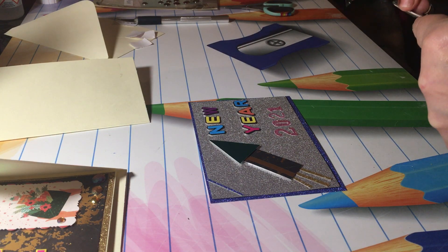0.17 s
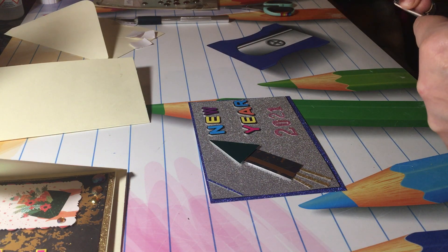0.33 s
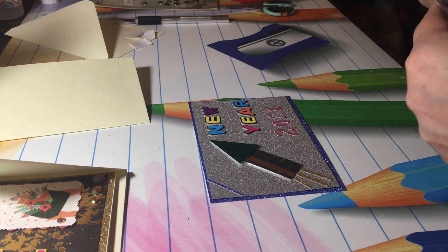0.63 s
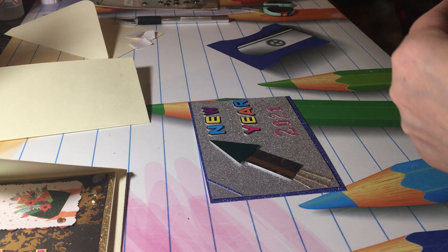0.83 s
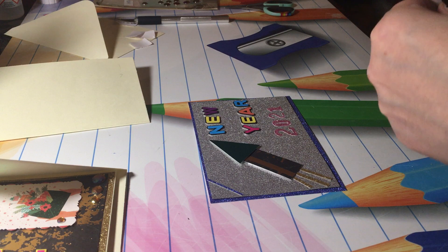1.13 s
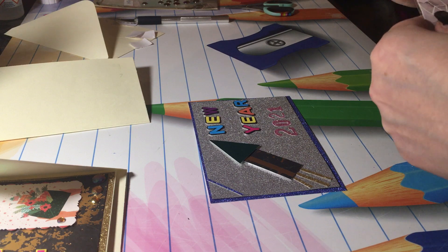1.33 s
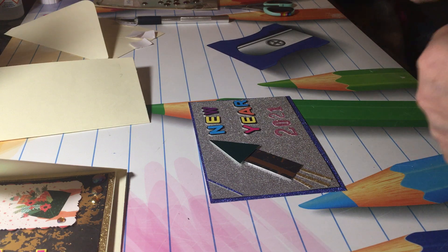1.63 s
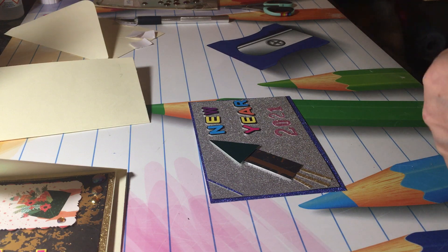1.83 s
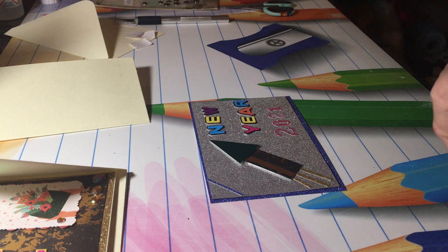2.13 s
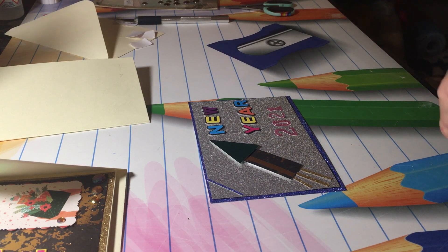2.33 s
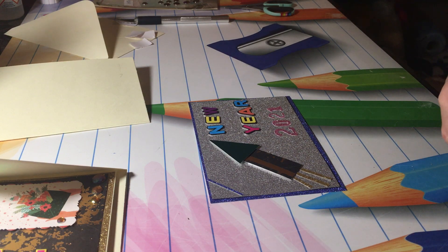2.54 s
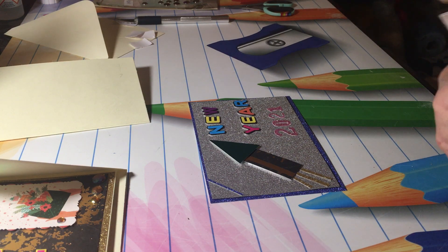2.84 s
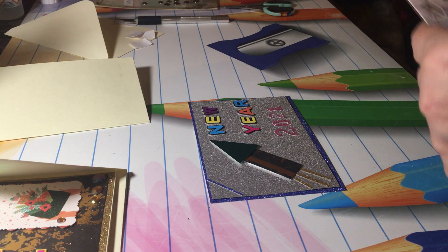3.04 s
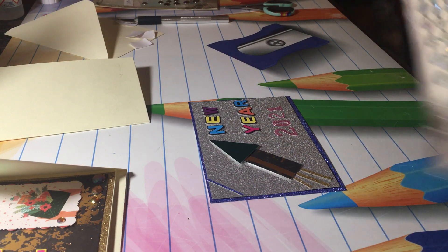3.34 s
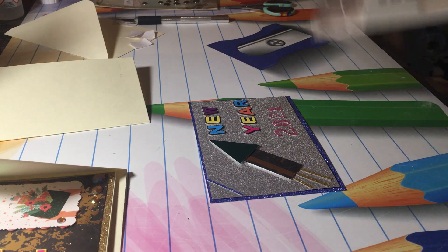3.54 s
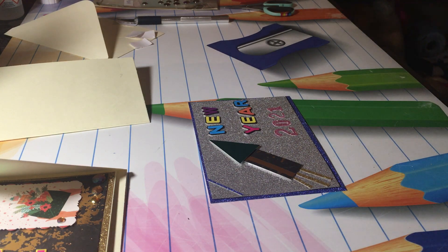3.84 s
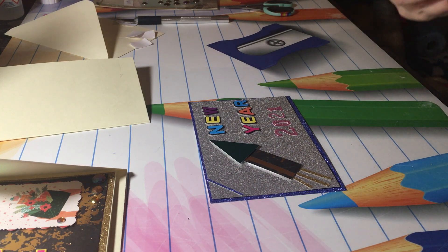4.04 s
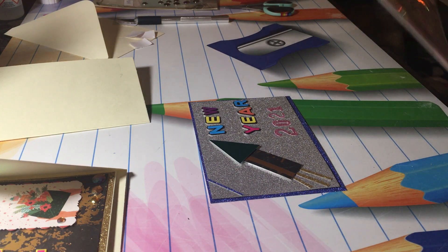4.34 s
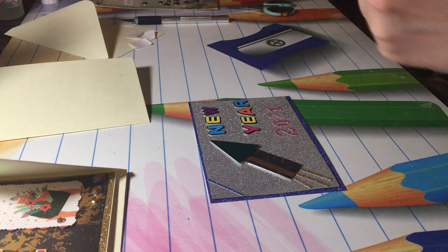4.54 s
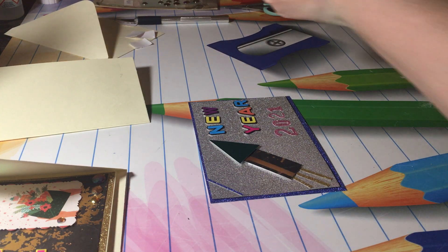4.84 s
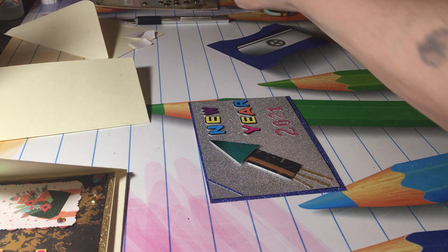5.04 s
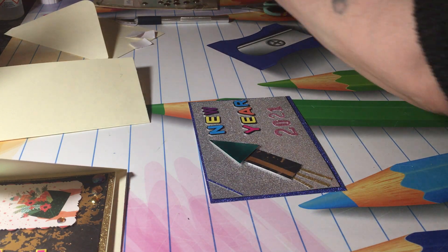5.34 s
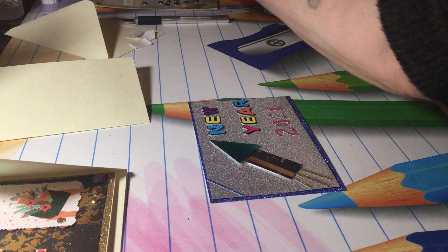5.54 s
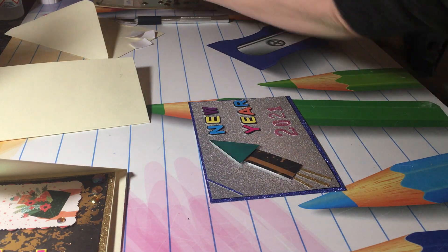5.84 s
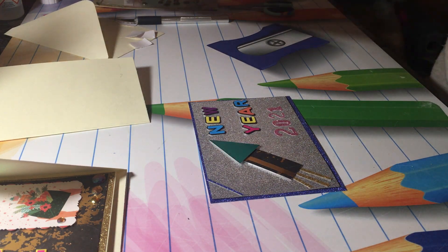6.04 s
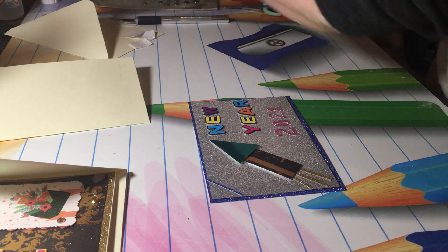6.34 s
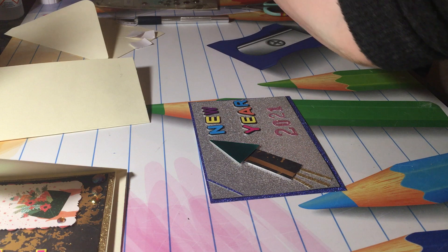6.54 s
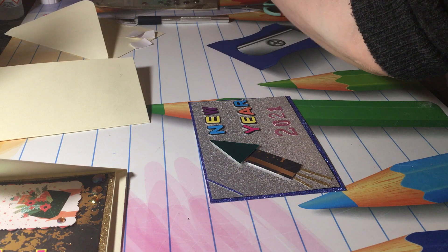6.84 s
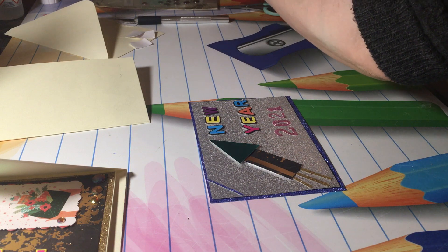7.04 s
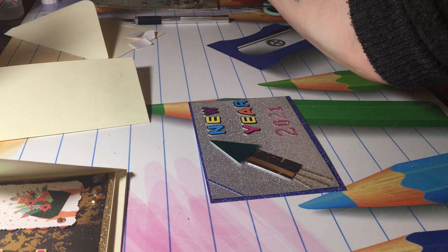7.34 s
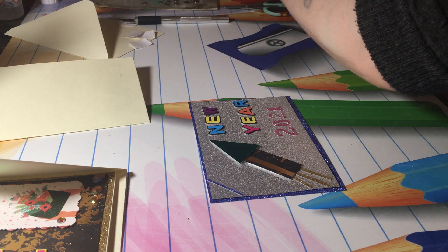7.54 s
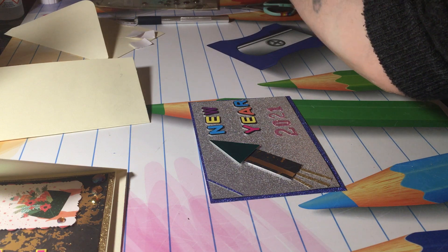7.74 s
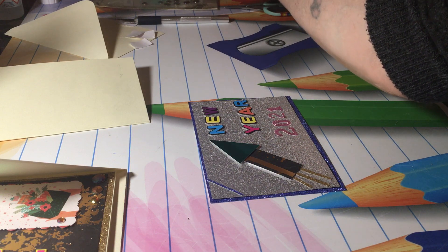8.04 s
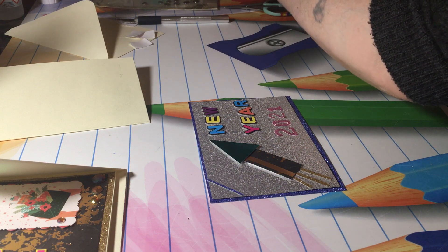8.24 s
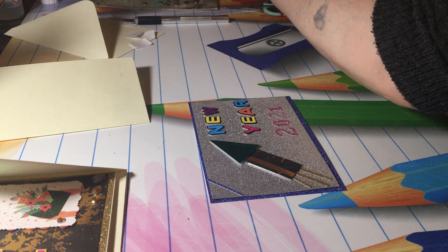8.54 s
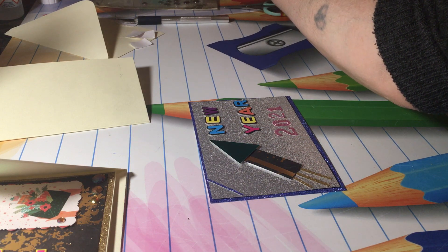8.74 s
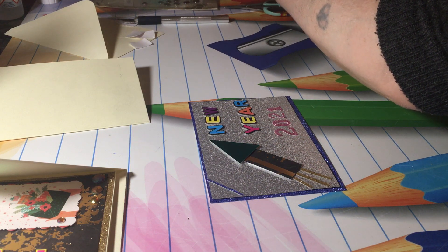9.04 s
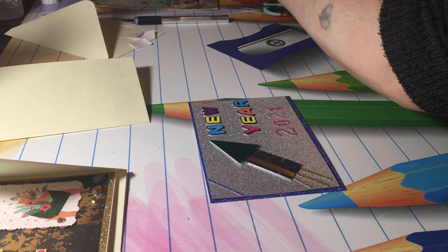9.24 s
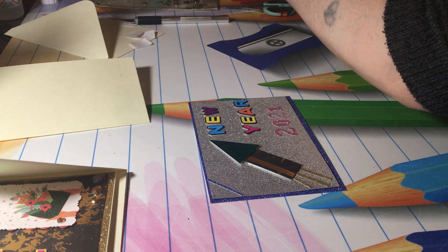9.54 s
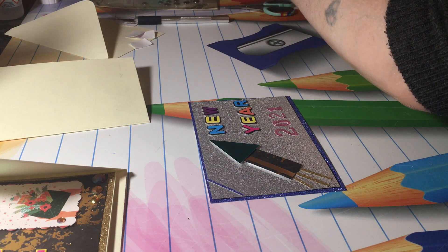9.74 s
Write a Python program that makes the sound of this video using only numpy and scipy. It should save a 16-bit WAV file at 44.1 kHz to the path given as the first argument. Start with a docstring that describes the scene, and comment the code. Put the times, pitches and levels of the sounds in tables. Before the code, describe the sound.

A close microphone over a craft table in a small, quiet room. Faint rumble, low hum and soft hiss lie underneath throughout. From 0.2 s light plastic ticks begin, thickening into crisp crackle at 0.5-1.0 s. From 1.4 to 3.0 s a stiff plastic sheet is bent and flipped vigorously: hard, dry snaps in tight clusters, strongest near 1.55, 1.83, 2.16, 2.39 and 2.65 s, with low puffs of air, dull flaps and a slight table boom. Another burst falls at 3.1-3.35 s, then lighter, scattered crinkles until 4.8 s. Fuller sliding rustles swell around 5.0, 5.4 and 5.6-5.85 s, fading by 6.3 s. Short crackles come at 6.6 and 7.0 s. Near stillness follows, with tiny pinched high ticks at 7.6-8.0 s and weak crinkles to 8.5 s. Soft, continuous-feeling rustling returns from 8.9 s until the end, just before 9.9 s. Each snap leaves a very short room tail.

```python
"""A stiff plastic sticker sheet is bent, shaken and rummaged through at a craft table in a small quiet room.
Creases buckle with sharp snaps of noise, each of its own colour; many tiny creases and slides make the rustle.
Large flips push a low puff of air, a dull flap and a boom of the table top; a few faint ticks ring high up.
The room answers with a short tail of fading noise, over a faint rumble, two hums and hiss.
The microphone stands over the table top, which cancels a few bands."""
import sys
import numpy as np
from scipy import signal
from scipy.fft import rfft, irfft
from scipy.io import wavfile
from scipy.ndimage import uniform_filter1d

SR = 44100
rng = np.random.default_rng(int(sys.argv[2]) if len(sys.argv) > 2 else 0)


def master(y):
    """Save y as 16-bit WAV."""
    cut = np.clip(np.atleast_2d(y).T, -1, 1)
    pcm = np.round(cut * 32767)  # scale
    wavfile.write(sys.argv[1], SR, pcm.astype(np.int16))


N = 435690
BOOM_HZ, BOOM_T60_S = 118, 0.15   # lowest mode of the table top


def from_db(db):
    """Turn dB into gain."""
    return 10 ** (np.asarray(db) / 20)


def rms_one(x):
    """Scale to rms 1."""
    return x / np.sqrt(np.mean(x ** 2) + 1e-20)


def band(x, low_hz, high_hz):
    """Gentle band-pass."""
    sos = signal.butter(2, [low_hz, min(high_hz, 0.45 * SR)], "band", fs=SR, output="sos")
    return signal.sosfilt(sos, x + 1e-18)


def ring(x, hz, t60_s):
    """Two-pole resonator: a unit click sets a decaying sine going."""
    radius = from_db(-60 / (t60_s * SR))
    angle = 2 * np.pi * hz / SR
    feedback = [1, -2 * radius * np.cos(angle), radius ** 2]
    return signal.lfilter([0, np.sin(angle)], feedback, x + 1e-18)


def drift(rate_hz):
    """Slow random wander of rms 1: noise through two equal low-pass poles."""
    pole = np.exp(-2 * np.pi * rate_hz / SR)
    noise = rng.standard_normal(N + SR)
    settled = signal.lfilter([1], [1, -2 * pole, pole ** 2], noise)[SR:]
    return rms_one(settled)


def place(times_s, shapes):
    """Lay one short shape at each time."""
    length = shapes.shape[1]
    out = np.zeros(N + length)
    starts = np.round(np.asarray(times_s) * SR).astype(int)
    np.add.at(out, starts[:, None] + np.arange(length), shapes)
    return out[:N]


# Spectrum of the quiet room before its overall level is set. Each row: frequency in Hz, relative level in dB per Hz.
AIR_SPECTRUM = [(20, -37), (40, -10), (90, -11.5), (130, -14.5), (250, -23), (520, -23.5), (750, -21.5),
                (2400, -38), (9300, -36.5), (14500, -38.5), (16500, -53.5)]
# Two low steady tones of the house, before the microphone roll-off. Each row: frequency in Hz, rms level in dB.
HOUSE_HUMS = [(48.4, -74.5), (75.4, -75.5)]
AIR_DB = -72   # rms of the noise, before the hums and the microphone


def air():
    """Steady rumble and hum of the house, hiss of the microphone: shaped noise plus wavering sines."""
    hz, level_db = np.transpose(AIR_SPECTRUM)
    grid_hz = np.maximum(np.fft.rfftfreq(N, 1 / SR), 1)
    shape = from_db(np.interp(np.log(grid_hz), np.log(hz), level_db))
    noise = irfft(rfft(rng.standard_normal(N)) * shape, N)
    out = from_db(AIR_DB) * rms_one(noise)
    for hum_hz, hum_db in HOUSE_HUMS:      # each tone wavers a little in phase and level
        phase = 2 * np.pi * hum_hz * np.arange(N) / SR + 0.57 * drift(1.4)
        out = out + np.sqrt(2) * from_db(hum_db + 1.6 * drift(2.0)) * np.sin(phase)
    return out


# How busy the hands keep the sheet, before swells are added. Each row: time in seconds, middle band level in dB,
# low band in dB re middle, high band in dB re middle.
HAND_ACTIVITY = [(0, -83.5, 3, -1), (.47, -84.5, -2, 5.5), (.72, -53.5, -5, -2.5), (.95, -62.5, -6, 0),
                 (1.06, -71.5, -2.5, 1), (1.2, -64, -6, -1), (1.35, -69.5, -4.5, -5), (1.6, -53.5, 0.5, -4),
                 (1.85, -60.5, -4, -14), (1.96, -72, -3, -14), (2.1, -57, -4.5, 1), (2.32, -58.5, -1.5, -2),
                 (2.57, -73, -5, -2), (2.87, -56, -3, 1), (3.08, -70.5, 0, -5), (3.3, -59.5, -2, -12),
                 (3.5, -69, -3.5, -4), (4.04, -62, -1, -4), (4.25, -73.5, 2.5, -9), (4.501, -76, -1, -5),
                 (4.56, -64, -0.5, -5.5), (5.14, -56, -2, -6.5), (5.205, -77, -2, -2),
                 (5.25, -62, -4, -3.5), (5.6, -55, -6, 4.5), (5.95, -72.5, 1.5, -4.5), (6.46, -85, 2, -4),
                 (6.55, -65.5, -4.5, -7), (6.74, -62, -3, -14), (6.84, -72.5, -1, 0), (6.94, -63.5, 1, -13),
                 (7.25, -80.5, 0, -3.5), (7.9, -85.5, 1, -4.5), (7.999, -78, -2, -0.5), (8.2, -85, 0.5, 0),
                 (8.55, -77.5, 0.5, -5), (8.86, -80.5, 5.5, -6), (8.9, -65.5, -2.5, -5.5),
                 (9.08, -65, -1.5, -4), (9.231, -71, -3.5, -12), (9.46, -66.5, -5.5, -6),
                 (9.55, -73, -4, -9), (9.7, -69, -3.5, -7), (9.88, -73.5, -7.5, -2)]
# Crumples and slides, each a swell of dense crackle. Each row: time of the top in seconds, ms to rise 8 dB,
# ms to fall 8 dB (both at least 2 ms when played), middle band level in dB, brightness in dB (high up, low down).
CRACKLE_SWELLS = [(0.427, 52, 48, -77, 2), (0.499, 18, 26, -69, 0), (0.557, 15, 38, -54, 1),
                  (0.671, 11, 30, -54.5, 5), (0.728, 26, 62, -55, -7.5), (0.839, 11.5, 31, -40.5, 2),
                  (1.104, 11.5, 28, -47, 0), (1.227, 8, 11, -44, -3), (1.373, -3, 23, -57, 9),
                  (1.417, 17, 50, -64, 7), (1.509, 35, 28, -54, 9), (1.57, 19, 13, -38, 2.5),
                  (1.696, 19, 10, -63, 5), (1.738, 3, 22, -60, -2), (1.836, -1, 8, -31.5, 2),
                  (1.977, 10, 28, -52, 3), (2.027, 13, 17, -42, -2), (2.153, 23, 32, -42, -0.5),
                  (2.227, 10, 3, -43, -4), (2.261, 12, 16, -53, -5), (2.389, 10.5, 0, -29, -3),
                  (2.466, 12, 26, -51, 5), (2.602, 16, 10, -53.5, 3), (2.65, 12.5, 15, -28.5, 2),
                  (2.72, 12, 20, -58, 9), (2.856, 30, 5, -44, -3), (2.917, 10, 16, -49, -9),
                  (2.958, 1, 8, -39, 0), (3.159, 25, 37, -51, -4.5), (3.261, 30, 13, -46, 7),
                  (3.338, 40, 56, -51, 6), (3.466, 21, 12, -63, -4), (3.546, 8, 22, -57, 3),
                  (3.594, 24, 47, -59, 0), (3.811, 66, 53, -65.5, 2), (3.892, 8, 18, -57.5, 1),
                  (3.961, 16, 40, -49.5, 1), (4.103, 0, 21, -59, -5), (4.174, 35.5, 28, -47.5, 10),
                  (4.545, 17, 38, -57, -3), (4.59, 37, 44, -56, -2), (4.661, 20, 31, -46.5, 2),
                  (4.813, 22, 30, -62, -2), (4.9, 30, 23, -59.5, 11), (5.042, 65, 39, -43.5, 5.5),
                  (5.29, 40, 39, -52, -2), (5.39, 55, 53, -50.5, 0.5), (5.449, 6, 27, -47.5, 0),
                  (5.623, 58, 46, -49.5, -5.5), (5.789, 43, 34, -65, 9), (5.839, 12, 54, -55, 0),
                  (5.957, 8, 15, -63.5, 1), (6.045, 16.5, 31.5, -61, -5), (6.211, 23.5, 44.5, -76.5, 2.5),
                  (6.52, 16.5, 32, -60.5, 0), (6.617, 17.5, 24, -43.5, 2), (6.876, 7, 25, -60, 5),
                  (6.914, 5, 16, -63, -6), (6.995, 5.5, 25, -43.5, 6), (7.024, 39.5, 29.5, -47.5, 3.5),
                  (7.382, 63, 68, -70, 6.5), (7.677, 61.5, 64.5, -82, -0.5), (7.972, 47.5, 35, -69.5, 9),
                  (8.03, 41, 40, -69.5, 0), (8.104, 50, 17.5, -68, 1.5), (8.167, 7, 25, -58, 2.5),
                  (8.333, 13.5, 26.5, -59.5, 6), (8.419, 25, 60, -71.5, 3), (8.503, 5.5, 53.5, -70, -6),
                  (8.931, 26, 34, -57.5, 6.5), (9.049, 74, 35, -55.5, -0.5), (9.116, 12, 45, -54.5, 8),
                  (9.17, 24, 20, -61.5, -6.5), (9.357, 38, 40, -60, 0), (9.5, 29, 30, -63.5, -4.5),
                  (9.61, 66, 25, -59, 3), (9.76, 40, 13, -64.5, 3), (9.836, 22, 32, -60, -2)]


def sheet_gains():
    """Level of each band: the busy hands plus swells that fall ever faster away from their top; powers add."""
    t = np.arange(0, N, 32) / SR
    top_s, rise_ms, fall_ms, level_db, bright_db = np.transpose(CRACKLE_SWELLS)[:, :, None]
    side_ms = np.maximum(np.where(t < top_s, rise_ms, fall_ms), 2)
    away = 1000 * np.abs(t - top_s) / side_ms
    swell_db = level_db - 8 * away ** 1.5
    at_s, *columns = np.transpose(HAND_ACTIVITY)
    busy_db, low_db, high_db = [np.interp(t, at_s, column) for column in columns]
    gains = []
    for rel_db, lean in ((low_db, -1), (0, 0), (high_db, 1)):
        swell_power = np.sum(from_db(swell_db + lean * bright_db) ** 2, axis=0)
        power = from_db(busy_db) ** 2 + swell_power
        gains.append(np.interp(np.arange(N) / SR, t, from_db(rel_db) * np.sqrt(power)))
    return gains


# Bands of the large, middle and small panels of the sheet. Each row: lower edge in Hz, upper edge in Hz.
PANEL_BANDS = [(600, 2490), (2500, 7830), (7000, 13400)]


def rustle(gains, per_s, spread_db, clump_db, slide_db, crack_s):
    """Tiny creases come in clumps with uneven sizes, over the hiss of plastic sliding on plastic."""
    clump = drift(55.0)
    born = rng.random(N) < per_s * from_db(clump_db * clump) / SR
    sizes = born * from_db(spread_db * np.minimum(rng.exponential(1, N), 4))
    out = 0
    for edges_hz, gain in zip(PANEL_BANDS, gains):
        coloured = sizes * from_db(3.6 * rng.standard_normal(N))      # each crease favours some panels
        burst = signal.lfilter([1], [1, -np.exp(-1 / (crack_s * SR))], coloured)
        creases = rms_one(band(burst * rng.standard_normal(N), *edges_hz))
        slide = rms_one(band(rng.standard_normal(N) * from_db(2.2 * clump), *edges_hz))
        out = out + gain * rms_one(creases + from_db(slide_db) * slide)
    return out


# How much three broad resonances stand out as the sheet is cupped. Each row: time in seconds,
# nominal lift in dB of the lowest, of the middle and of the upper one.
CUPPING_LIFTS = [(0, 6, -3, -2), (1, 6, 4, -5), (2, -6, 3, -0.5), (2.9, 0, 3, -0.5), (3.18, 11.5, 0, -4),
                 (3.8, 5.5, -1.5, -2.5), (4.7, 2.5, 3.5, 2), (5.6, 3, 1.5, -2), (6.3, 4.5, 0, -0.5),
                 (6.7, 1.5, 5, 4.5), (7.05, -4.5, 9.5, 2.5), (7.3, 2, 2.5, -0.5), (8.3, 6.5, 2, 1),
                 (9.099, 0.5, 5, 7), (9.6, 3.5, 3, 3), (9.88, -13, 14, 10)]
# The three resonances. Each row: centre in Hz, width in Hz.
CUP_RESONANCES = [(750, 600), (2100, 700), (3200, 1400)]


def cupped(x):
    """Lift or lower each resonance by adding or taking away its band as the sheet is cupped."""
    at_s, *lifts_db = np.transpose(CUPPING_LIFTS)
    out = x
    for (hz, width_hz), lift_db in zip(CUP_RESONANCES, lifts_db):
        extra = from_db(np.interp(np.arange(N) / SR, at_s, lift_db)) - 1
        out = out + extra * band(x, hz - width_hz / 2, hz + width_hz / 2)
    return out


def patchy(x, depth, rate_hz):
    """As the sheet changes shape, narrow bands swell and sink on their own."""
    edges_hz = np.geomspace(500, 14000, num=19)
    bands_hz = zip(edges_hz, edges_hz[1:])
    return x + sum(depth * drift(rate_hz) * band(x, low, high) for low, high in bands_hz)


# The room's tail. Each row: band frequency in Hz, seconds to die by 60 dB, nominal tail level in dB re direct sound.
ROOM_TAIL = [(288, 0.29, -12), (1260, 0.27, -8), (3540, 0.25, -13), (10300, 0.24, -15)]


def room(x, first_s):
    """Dense reflections: noise that dies band by band, starting after the first wall."""
    t = np.arange(SR // 2) / SR
    tail = 0
    for hz, t60_s, tail_db in ROOM_TAIL:
        noise = band(rng.standard_normal(len(t)), hz * 0.6, hz * 1.46)
        noise = noise * from_db(-60 * t / t60_s) * (t > first_s)
        tail = tail + from_db(tail_db) * noise / np.sqrt(np.sum(noise ** 2) * SR / 2 / (0.74 * hz))
    return signal.fftconvolve(x, tail)[:N]


# The whole sheet flips; handling() and flips() both play these. Each row: start in seconds,
# puff level in dB before its lift and decay, puff frequency in Hz, then the levels in dB of the dull flap
# and of the table boom, both before their rise and fall.
SHEET_FLIPS = [(0.9, -44, 316, -61, -62), (1.103, -53, 94, -62, -67), (1.219, -52, 400, -52, -71),
               (1.568, -41, 312, -59, -60), (1.73, -43, 400, -50, -73), (1.829, -24.5, 328, -36.5, -49),
               (2.023, -39, 128, -50, -51), (2.141, -42, 265, -54, -55), (2.2, -51, 250, -51, -58),
               (2.385, -37.5, 102, -38, -52), (2.455, -51, 109, -58, -54), (2.6398, -22, 404, -48.5, -56),
               (2.642, -29.5, 141.5, -47, -59.5), (2.81, -57, 100, -65, -56), (2.947, -37, 318, -43, -60),
               (3.132, -46, 310, -46, -62), (3.15, -50, 600, -56, -73), (3.25, -47, 240, -46, -69),
               (3.326, -50, 200, -51, -56), (3.98, -58, 250, -56, -66), (4.165, -55, 191, -59, -72),
               (4.536, -47.5, 125, -62, -55), (4.994, -51, 345, -44, -63), (5.371, -55, 383, -47, -69),
               (5.599, -56, 361, -60, -78), (6.512, -55, 353, -62, -69), (6.613, -49, 236, -59, -77),
               (7.0, -64, 251, -63, -82), (8.05, -65, 250.7, -61, -85), (8.329, -56, 236, -61, -79),
               (8.495, -56, 227, -67.5, -73), (8.98, -52, 380, -59, -67), (9.045, -47.5, 400, -61, -75),
               (9.364, -49, 210, -60, -66)]
FLAP_RISE_S, FLAP_FALL_S = 0.028, 0.022   # time constants
BOOM_RISE_S, BOOM_FALL_S = 0.011, 0.044
# dull noise and boom follow the low band of the rustle: (dB when that band is at -60 dB, dB per dB)
DULL_FOLLOWS = (-67.5, 0.6)
BOOM_FOLLOWS = (-77.5, 0.62)


def handling(busy):
    """Dull lumpy noise of the moving sheet, and the table top booming on its lowest mode; flips swell both."""
    start_s, dull_db, boom_db = np.transpose(SHEET_FLIPS)[[0, 3, 4], :, None]
    t = np.arange(SR // 2) / SR
    busy_db = 20 * np.log10(uniform_filter1d(busy, size=1500)) + 60   # dB above -60, smoothed over 34 ms
    lumpy = rng.standard_normal(N) * from_db(2.5 * drift(33.0))
    dull = rms_one(band(lumpy, 190, 430))
    boom = rms_one(ring(rng.standard_normal(N), BOOM_HZ, BOOM_T60_S))
    layers = ((dull, dull_db, DULL_FOLLOWS, FLAP_RISE_S, FLAP_FALL_S),
              (boom, boom_db, BOOM_FOLLOWS, BOOM_RISE_S, BOOM_FALL_S))
    out = 0
    for noise, flip_db, (base_db, slope), rise_s, fall_s in layers:
        envelope = (1 - np.exp(-t / rise_s)) * np.exp(-t / fall_s)
        swell = place(start_s[:, 0], from_db(flip_db) * envelope)
        out = out + noise * (swell + from_db(base_db + slope * busy_db))
    return out


# Creases that buckle at set times. Each row: start in seconds, middle band peak in dB before the band trim,
# low band in dB re middle, high band in dB re middle (both before the trims).
CREASE_SNAPS = [(0.2333, -47.5, -10, -14), (0.2617, -61, 6, -7), (0.2785, -52, 5.5, -4),
                (0.2987, -50.5, 3, 8), (0.4172, -35, -5, -2), (0.429, -48, 3, -4), (0.4881, -36.5, -1, 7),
                (0.5348, -32, -4, 9.5), (0.5467, -31, -3, 7), (0.5594, -34, -13, -2),
                (0.5847, -29, -13, -3), (0.5997, -31, -7, 3), (0.6145, -38.5, -2, 5),
                (0.623, -38, -17, 8.5), (0.673, -27.5, -9, 0), (0.6905, -29, -12, -5),
                (0.702, -22, -6.5, -8), (0.7159, -18, -31, -2.5), (0.7331, -26, -13, -8),
                (0.767, -37, -11, -1), (0.799, -32, -1, 3), (0.8303, -14.5, -23, -4), (0.8584, -31, -4, -9),
                (0.8753, -37, 2, -1), (0.9105, -35, -15, 11), (0.9479, -34, -4, 13), (0.979, -38, -19, -5),
                (0.9974, -25.5, -11.5, -14), (1.0342, -45, 2.5, -10), (1.0849, -36, -2, 8),
                (1.0956, -29, -14, 5), (1.112, -33.5, -5, 12.5), (1.1709, -41, -2, 2), (1.1796, -36, -2, 2),
                (1.2126, -31, -4, -2), (1.2231, -18.5, -3, 5), (1.309, -42, 3, 6.5), (1.3645, -22, -18, 0),
                (1.4081, -18.5, -24, -13), (1.4397, -33, -13, -8), (1.4551, -38, 2.5, -4),
                (1.4817, -27.5, -9, -9), (1.4886, -36, -9, 4), (1.5013, -13.5, -21, 1.5),
                (1.5089, -15, -13, -3.5), (1.553, -22, -1, -6.5), (1.559, -6.5, -8, -0.5),
                (1.5709, -26, -13, -3), (1.5743, -8, -16, -4.5), (1.578, -25.5, -1, -3),
                (1.588, -10, -10, -5), (1.601, -23, -7, -8), (1.613, -19, -19, -4),
                (1.6309, -13.5, -10, -7.5), (1.658, -24.5, -1, 0), (1.694, -28, -8, -6),
                (1.6985, -29.5, 0, -6.5), (1.7284, -30, 6, -12), (1.7353, -20.5, -4, -1.5),
                (1.762, -40, -2, 8), (1.821, -40, 9, -7.5), (1.829, -6.5, -7, -1), (1.8312, -2, -14, -4.5),
                (1.8351, -13, -11, -8), (1.8396, -11, -21, -3.5), (1.876, -23.5, -2, 0.5),
                (1.8854, -22.5, -21, -2), (1.8925, -27, -8, -4.5), (1.9725, -38, 0, 4),
                (2.0193, -26, 4, -4), (2.0237, -16, 7.5, -13), (2.0378, -26, -5, -4), (2.0676, -31, -6, -8),
                (2.1068, -35, -6, 7.5), (2.1205, -34, -4, -1), (2.1398, -14.5, -16, 5),
                (2.144, -12.5, -8, 2.5), (2.1532, -12.5, -9, -7.5), (2.1626, -1.5, -15.5, -13),
                (2.197, -21, -6, 0.5), (2.2083, -28, -15, 3), (2.2216, -16.5, -5.5, -3.5),
                (2.229, -19.5, -15, -4.5), (2.249, -21, -24, 9), (2.2709, -38, 13, 4),
                (2.327, -29.5, -1, 0), (2.3516, -24.5, 1, -3.5), (2.355, -25, 3.5, -9.5),
                (2.36, -19.5, -11, 1), (2.369, -32, -11, 3), (2.3836, -6, -3.5, -3),
                (2.3918, -15.5, -7, -3.5), (2.425, -30, 1, -5), (2.4584, -13, -12, -0.5),
                (2.5166, -31, -1, -0.5), (2.5401, -26.5, -2.5, -8), (2.5856, -36, -14, -1),
                (2.6015, -34, -1, 8.5), (2.6199, -18, -7, -8.5), (2.6365, -25, -1, -9),
                (2.6392, -10.5, -3.5, 5), (2.648, -10.5, 2, -1.5), (2.656, -15.5, -5, -4),
                (2.7075, -17.5, -11.5, 3.5), (2.7272, -14.5, -18, -7), (2.744, -24, -16, -7.5),
                (2.7975, -21, -10.5, -2), (2.8287, -21.5, -4, 4), (2.8379, -28, 2, -6),
                (2.8465, -15, -24, -10), (2.8514, -10, -12.5, -6.5), (2.8546, -26, 5, -11),
                (2.8607, -25, 3, -2), (2.885, -10.5, -8, -1.5), (2.891, -11.5, -19, -4.5),
                (2.9075, -25.5, 2.5, -6), (2.912, -16, -4, -13), (2.9169, -21.5, -7, 0),
                (2.9284, -21, 0, -4), (2.9506, -13.5, -4, -2.5), (2.9555, -25, -5, -9),
                (3.06, -39.5, -7, -4), (3.0963, -44, 8, -12), (3.1339, -26.5, -4, -5),
                (3.1484, -41, 10, -8), (3.1653, -28.5, -25, 4.5), (3.2268, -25.5, -7, 5),
                (3.236, -21, -7.5, 2), (3.2531, -25, -13, -2), (3.2587, -20.5, -14, -4),
                (3.2611, -15.5, -13, 6), (3.2985, -30, 1, -6), (3.315, -39, -8, -3),
                (3.3273, -17.5, -18, -1.5), (3.3347, -29, -21, 0), (3.3558, -26, -18, -7),
                (3.459, -38.5, -5, 0), (3.4926, -48.5, -13, 16), (3.5055, -29, -17, -8),
                (3.5365, -28, -9, 1), (3.5859, -36, 0.5, 6), (3.768, -49, -11, 6), (3.7883, -40, 1, -13),
                (3.8069, -35.5, -8.5, -8), (3.865, -43, -4, 3), (3.8859, -36, 6.5, 8),
                (3.9146, -38.5, 3, -4), (3.9324, -29, -1, -8), (3.9496, -33, 1, -2), (3.9668, -23, -10, 6),
                (3.9892, -32, -14, 7), (3.9997, -41, 3, 2), (4.0495, -35, -2, -6), (4.0976, -36.5, 3, -2),
                (4.1018, -30.5, -9, 9.5), (4.1626, -32, -14, 8), (4.182, -34, -14.5, 1),
                (4.3474, -49, -10, 0), (4.3986, -38.5, -12, -0.5), (4.5296, -42.5, 5, -8.5),
                (4.5457, -30.5, -1.5, -18), (4.5851, -45, 2, -6), (4.5984, -43, -4, -10),
                (4.6486, -29.5, -2, 2), (4.6686, -34, -12, 4), (4.7053, -39.5, 4, -7),
                (4.7538, -32, -0.5, -5), (4.8114, -38, -4, 1), (4.879, -37, -12, 5), (4.9303, -42, 1, -9.5),
                (4.9426, -37, -3, 15.5), (4.9966, -22, -8, 2.5), (5.0119, -23, -12, -4),
                (5.0154, -19.5, -11, -4), (5.034, -17.5, -19, 1), (5.041, -24, -34, 9),
                (5.048, -29.5, -4, -7), (5.069, -44, 5, -9), (5.1266, -40, -2, 1), (5.2386, -43, -11, 8),
                (5.2678, -34, -13, -2), (5.2823, -32, -4, 5), (5.302, -33, -9, -3),
                (5.3276, -23.5, -11.5, -3), (5.3626, -30.5, -6, 11), (5.3836, -24.5, -11, 4),
                (5.4317, -31, -11, -4), (5.4419, -26.5, -6.5, 1), (5.447, -30, -7, -1),
                (5.5277, -37, -15, -2), (5.5535, -34.5, -5, 10.5), (5.5958, -34, -9, 2),
                (5.614, -35, -3, -3), (5.629, -24.5, -7.5, -10), (5.7813, -41, -15, 8),
                (5.8296, -24, -5, 5), (5.8425, -39, -13, -1), (5.9522, -52, -1, 0), (6.0408, -41.5, -8, -1),
                (6.162, -44, -5, -2), (6.2042, -41, -5.5, -7), (6.512, -41.5, 0, 7),
                (6.5739, -37, -7.5, -11.5), (6.5927, -38, -8, -5), (6.6144, -27, -5, -11),
                (6.78, -47, -5, 0), (6.91, -42, 7, -12), (6.9889, -25.5, -11, -4.5),
                (7.0143, -27.5, -14, 6.5), (7.0256, -27.5, -6, -11), (7.964, -38, -9.5, -2),
                (8.0335, -53, -11, 2), (8.076, -53.5, 5.5, -6), (8.1553, -46, -11.5, 1),
                (8.329, -45, -9, 3.5), (8.4951, -37, -3, -17.5), (8.561, -50, -4, -9.5),
                (8.7166, -53, 1, -8.5), (8.8043, -56, -2.5, -15.5), (8.9475, -42.5, -9, -8),
                (8.983, -38, 0, -10), (8.993, -37.5, -0.5, 4), (9.0466, -37.5, 6, -16),
                (9.1632, -43, -8, -14), (9.38, -43, -8, -3), (9.484, -39, -12, -13), (9.4992, -42, -6, -11),
                (9.603, -47.5, 4.5, -12), (9.697, -45, -7, -9), (9.838, -44, 2, 8)]
# smaller creases buckle at random: their count, least peak over the middle band of the rustle, its spread,
# then their usual colour re middle and the spread of that colour
SMALL_COUNT = 700
SMALL_OVER_DB, SMALL_SPREAD_DB = 3.5, 3.5
SMALL_LOW_DB, SMALL_HIGH_DB, SMALL_COLOUR_DB = -5.5, -0.5, 6


def small_creases(busy):
    """Creases at random times, scaled to the rustle around them; columns as in the snap table."""
    at = rng.random(SMALL_COUNT) * (N - 1)
    size = rng.exponential(1, SMALL_COUNT)
    low, high = rng.standard_normal((2, SMALL_COUNT))
    rustle_db = 20 * np.log10(busy[at.astype(int)])
    peak_db = rustle_db + SMALL_OVER_DB + SMALL_SPREAD_DB * np.minimum(size, 4)
    return [at / SR, peak_db, SMALL_LOW_DB + SMALL_COLOUR_DB * low, SMALL_HIGH_DB + SMALL_COLOUR_DB * high]


def snaps(busy, fast_s, slow_s, slow_db, trims_db):
    """A crease lets go in a sharp crack, then the panel shivers a little longer."""
    start_s, peak_db, low_db, high_db = np.hstack([np.transpose(CREASE_SNAPS), small_creases(busy)])
    t = np.arange(600) / SR
    fade = np.exp(-t / fast_s) + from_db(slow_db) * np.exp(-t / slow_s)
    out = 0
    for edges_hz, rel_db, trim_db in zip(PANEL_BANDS, (low_db, 0, high_db), trims_db):
        shapes = band(rng.standard_normal((len(start_s), len(t))) * fade, *edges_hz)
        lag = rng.integers(3, 40, (len(start_s), 1))      # the far edge of the panel answers samples later
        late = np.arange(len(t)) - lag
        answer = np.take_along_axis(shapes, np.maximum(late, 0), axis=1) * (late >= 0)
        shapes = shapes - 0.45 * answer
        shapes /= np.abs(shapes).max(axis=1, keepdims=True)
        out = out + place(start_s, shapes * from_db(peak_db + rel_db + trim_db)[:, None])
    return out


def flips(cycles, knock_db):
    """A push of air that swings about once; the table top rings on after it."""
    start_s, level_db, hz = np.transpose(SHEET_FLIPS)[:3, :, None]
    turns = hz * np.arange(2000) / SR
    swing = np.sin(2 * np.pi * turns) * np.exp(-turns / cycles)
    pushes = place(start_s[:, 0], from_db(level_db + 4) * swing)
    return pushes + from_db(knock_db) * ring(pushes, BOOM_HZ, BOOM_T60_S)


# Faint pinched ticks of a small crease. Each row: start in seconds, nominal peak in dB, frequency in Hz.
CREASE_TICKS = [(7.577, -66.5, 8830), (7.671, -59, 9400), (7.7386, -65.5, 9350), (8.0217, -51.5, 9200)]


def ticks():
    """Short narrow bursts of noise high up, dying away exponentially."""
    t = np.arange(1800) / SR
    shapes = []
    for _, level_db, hz in CREASE_TICKS:
        noise = rms_one(band(rng.standard_normal(len(t)), hz * 0.94, hz * 1.024))
        shapes.append(from_db(level_db) * noise * np.exp(-t / 0.017) * 0.47)
    return place(np.array(CREASE_TICKS)[:, 0], np.array(shapes))


def scene():
    """Sheet, room, handling and background."""
    gains = sheet_gains()
    sheet = snaps(gains[1], fast_s=0.00013, slow_s=0.0023, slow_db=-15.0, trims_db=(-0.1, -1.1, -0.6))
    crackle = rustle(gains, per_s=1400, spread_db=1.0, clump_db=5.0, slide_db=2.5, crack_s=0.00063)
    sheet = sheet + patchy(cupped(crackle), depth=0.19, rate_hz=7.6)
    sheet = sheet + flips(cycles=0.8, knock_db=-56.5) + ticks()
    return (sheet + room(sheet, first_s=0.0039) + handling(gains[0]) + air())[None]


def bell(x, hz, width_hz, db):
    """A peak or a dip in the spectrum."""
    c = -2 * np.cos(2 * np.pi * hz / SR)
    g = from_db(db / 2)
    a = np.pi * width_hz / SR
    return signal.lfilter([1 + a * g, c, 1 - a * g], [1 + a / g, c, 1 - a / g], x)


# Table-top cancellations at the microphone. Each row: centre in Hz, width in Hz, depth in dB.
TABLE_DIPS = [(4830, 79, -3.5), (7540, 1200, -3), (10660, 1200, -6), (767, 550, -6.5)]
MIC_LOW_HZ = 45      # the microphone rolls off below this
CUTOFF_HZ = 16950    # 60 dB down from here up


def record(dry):
    """Deep bass is lost, the table top under the microphone cancels a few bands; the top is cut."""
    dry = signal.sosfilt(signal.butter(3, MIC_LOW_HZ, "high", fs=SR, output="sos"), dry)
    for hz, width_hz, db in TABLE_DIPS:
        dry = bell(dry, hz, width_hz, db)
    return signal.sosfilt(signal.cheby2(12, 60, CUTOFF_HZ, fs=SR, output="sos"), dry)


dry = scene()
out = record(dry)
master(out)
```